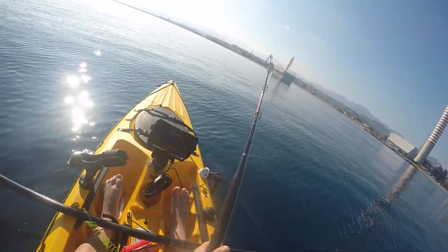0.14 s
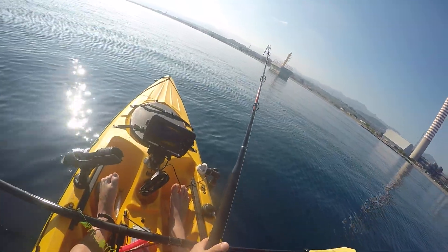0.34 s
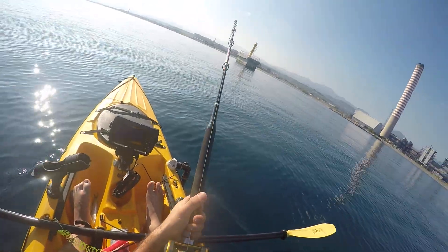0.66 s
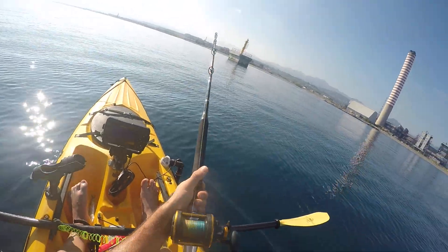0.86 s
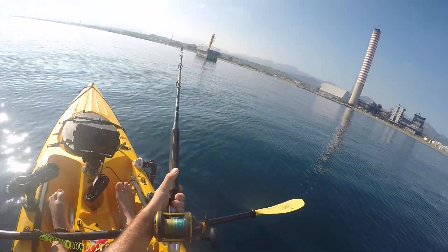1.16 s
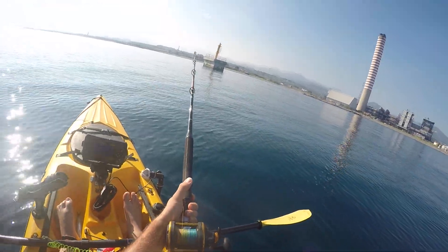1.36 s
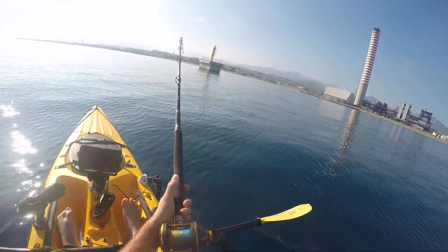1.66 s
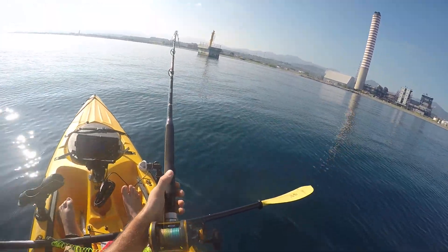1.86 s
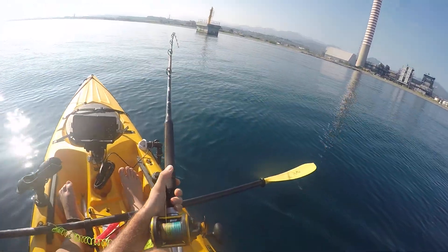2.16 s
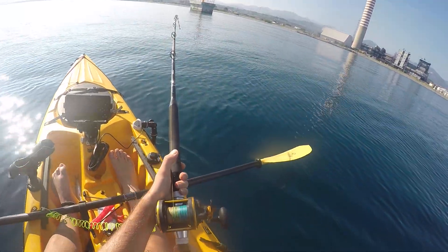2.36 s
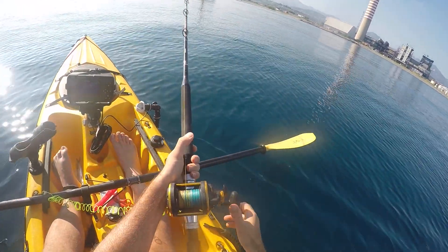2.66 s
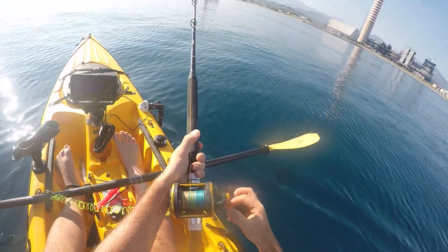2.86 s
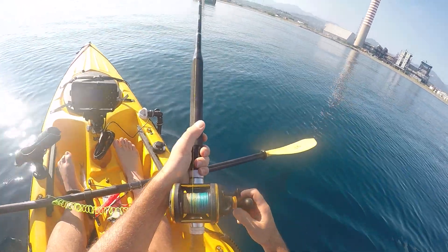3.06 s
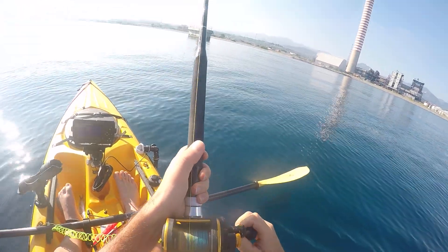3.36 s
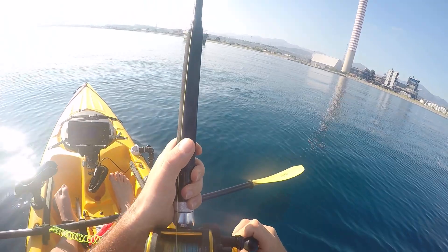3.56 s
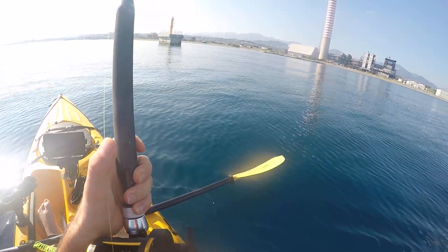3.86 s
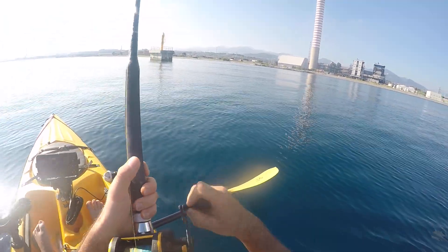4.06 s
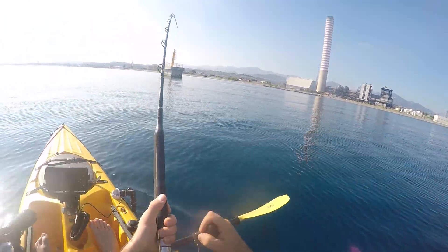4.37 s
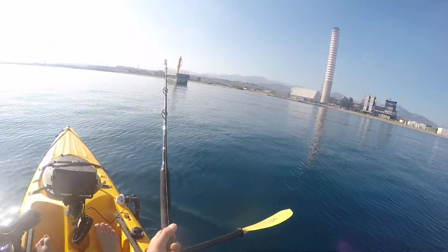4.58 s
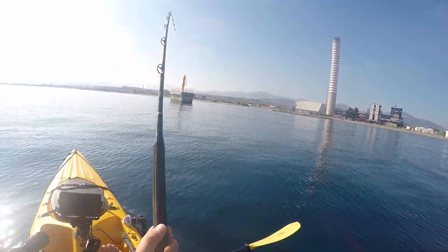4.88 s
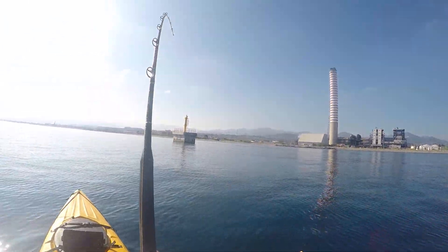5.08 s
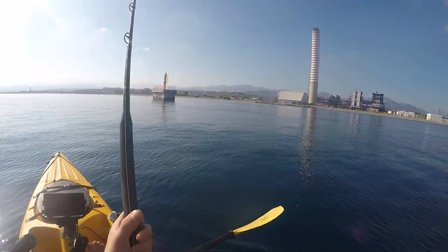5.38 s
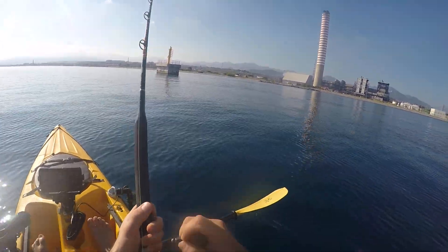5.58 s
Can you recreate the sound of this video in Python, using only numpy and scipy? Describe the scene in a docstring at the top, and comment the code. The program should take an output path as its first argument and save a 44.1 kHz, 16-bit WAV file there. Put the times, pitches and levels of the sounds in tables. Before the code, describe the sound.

A fishing reel's clicker buzzes in four short runs as line is pulled out, over light wind rumbling on the microphone.

```python
"""A fishing reel's clicker sounds as a hooked fish takes line from a kayak angler in four short runs.
The pawl snaps over the spool's ratchet, and each impact excites the resonances of the reel and the pawl
spring: single ticks merge into a buzz as the spool speeds up. The rod is lifted for the last two runs.
The line jerks tight once and rasps faintly under tension, and gear knocks softly on the hull.
Behind it all, light wind rumbles on the microphone over a calm sea."""
import sys
import numpy as np
from scipy import signal
from scipy.fft import rfft, irfft, next_fast_len
from scipy.io import wavfile

SR = 44100
rng = np.random.default_rng(int(sys.argv[2]) if len(sys.argv) > 2 else 0)


def pcm_store(signal):
    """Save signal as 16-bit PCM."""
    levels = np.round(np.clip(np.atleast_2d(signal), -1, 1) * 32767)
    wavfile.write(sys.argv[1], SR, levels.astype(np.int16).T)


N = 252693

# Spectra of the wind and of the sea's hush. Each row: frequency in Hz, relative spectral density in dB.
WIND_SPECTRUM = [(15, -11.5), (24, 8.5), (36, 4), (50, -2), (63, -13.5), (80, -16.5), (110, -26.5),
                 (200, -41), (500, -60), (1500, -120)]
SEA_SPECTRUM = [(76, -49), (130, -1.5), (344, -7), (446, -8.5), (482, -9), (1070, -11.5), (1470, -13.5),
                (2720, -13.5), (7050, -20), (8430, -22.5), (15000, -27.5)]
# Gusts. Each row: time of the peak in seconds, level in dB above the breeze.
WIND_GUSTS = [(.9, 2.5), (4.2, 5), (5.65, 11.5)]
# Spells of taut line. Each row: start in seconds, end in seconds, rasp level in dB.
LINE_PULLS = [(-.05, 0.148, -69.5), (0.557, 1.847, -69), (1.956, 2.69, -70), (4.91, 5.302, -73)]
# Gear striking the hull. Each row: time in seconds, level in dB, spectral tilt in dB per octave.
HULL_KNOCKS = [(.163, -32, -2), (.234, -35, 0), (.248, -37, 3), (5.18, -29, 3), (5.197, -30, -5)]
# Reflections from the angler's body and the hull. Each row: delay in seconds, gain in dB.
REFLECTIONS = [(.0026, -14), (.0058, -16.5)]
# Resonances of the hull, the jerked line, the pawl spring and the reel (rod low, rod lifted).
# Each row: centre frequency in Hz, width in Hz, relative level in dB.
HULL_MODES = [(880, 420, -2), (1380, 380, 0), (2900, 1500, -20)]
TWITCH_MODES = [(1380, 260, 1), (2630, 180, -12), (3590, 600, -0.5), (6340, 590, -17)]
PAWL_MODES = [(3353, 202, -3.5), (7670, 410, -25), (10120, 150, -17.5)]
REEL_LOW_MODES = [(1488, 330, -5), (2845, 470, 1.5), (3787, 440, 4), (4716, 810, -1.5), (5740, 240, -6.5),
                  (6480, 740, -10), (7340, 690, -8), (8550, 1400, -13.5), (10270, 1300, -3),
                  (12000, 1300, -12.5), (12900, 1300, -19), (14700, 1200, -16.5)]
REEL_LIFTED_MODES = [(1368, 340, -0.5), (1980, 120, -6.5), (2970, 590, -0.5), (3780, 610, 3),
                     (4470, 420, -2.5), (4860, 750, -2), (5790, 1110, -6.5), (7790, 1600, -9.5),
                     (10050, 1060, -3), (11400, 1100, -11.5), (12560, 2000, -12), (14900, 770, -14)]
# Single teeth slipping as the spool creeps.
# Each row: time in seconds, relative strike level in dB, emphasis of the spring's ring in dB.
SINGLE_TICKS = [(1.276, -42.5, -21), (2.608, -40, -9), (3.764, -69, 6), (4.673, -46, -17),
                (4.74, -47.5, 0.5), (4.967, -72.5, 13)]
# Spool speed in each of the four runs. Each row: time in seconds, speed in teeth per second.
RUN_1_SPEED = [(0.732, 41.1), (0.85, 88.4), (0.97, 65.7), (1.1, 82.6), (1.224, 39.5)]
RUN_2_SPEED = [(2.007, 39.2), (2.05, 60.4), (2.12, 115.0), (2.28, 137.7), (2.41, 136.4), (2.582, 47.3)]
RUN_3_SPEED = [(3.856, 19.5), (3.92, 59.4), (4.0, 86.0), (4.07, 161.0), (4.36, 145.6), (4.41, 215.2),
               (4.44, 124.6), (4.53, 136.0), (4.642, 39.9)]
RUN_4_SPEED = [(5.21, 51.4), (5.35, 188.2), (5.39, 109), (5.54, 192.7), (5.59, 93.4), (5.67, 248.5),
               (5.727, 101.7)]
# How the pawl lands in each run. Each row: relative strike level in dB at the start and at the end,
# emphasis of the spring's ring in dB at the start and at the end, scale of the judder in seconds.
PAWL_LANDINGS = [(-41.5, -42, 2.5, 1, .00003), (-43, -40, 4, 0, 0.000014), (-39.5, -46, 12, 0.5, 0.00028),
                 (-43, -43, 4.5, 4.5, 0.00018)]

LIFT_S = 3.5  # the rod is lifted towards the chest
SLIDE_S = .0006  # parts slide this long before they snap together
HIT_SIZE = 2048  # samples in one impact response
HIT_HZ = np.fft.rfftfreq(HIT_SIZE, 1 / SR)


def amp(db):
    """Amplitude grows tenfold for every 20 dB."""
    return 10 ** (np.asarray(db) / 20)


def unit(x):
    """Normalisation brings x to rms 1."""
    return x / np.sqrt(np.mean(x ** 2) + 1e-20)


def slope(points, hz):
    """A spectral envelope joins (Hz, dB) points on a logarithmic frequency axis."""
    corner_hz, db = np.transpose(points)
    return amp(np.interp(np.log(hz + 1), np.log(corner_hz), db))


def resonances(modes, hz):
    """Steep-sided resonance peaks add in power, giving a gain curve of rms 1."""
    peaks = (amp(db) / (1 + (2 * (hz - centre) / width) ** 2) for centre, width, db in modes)
    return unit(np.sqrt(sum(peak ** 2 for peak in peaks)))


def filtered(x, gain):
    """A linear filter multiplies the spectrum by gain(hz)."""
    size = next_fast_len(N + SR // 2)
    return irfft(rfft(x, size) * gain(np.fft.rfftfreq(size, 1 / SR)), size)[:N]


def noise(gain):
    """Filtering white noise gives coloured noise, here of rms 1."""
    return unit(filtered(rng.standard_normal(N), gain))


def causal(gains):
    """Causality: minimum phase makes each gain curve ring only after the blow."""
    cepstrum = irfft(np.log(gains + 1e-6))
    cepstrum[..., 1:HIT_SIZE // 2] *= 2
    cepstrum[..., HIT_SIZE // 2 + 1:] = 0
    return np.exp(rfft(cepstrum))


def contacts(count, chatter, t60, memory):
    """The force spectrum of a hard contact is an impulse plus a rattle, whose energy share is chatter."""
    t = np.arange(HIT_SIZE) / SR
    white = rng.standard_normal((count, HIT_SIZE))
    rattle = signal.lfilter([1], [1, -memory], white, axis=0)  # partly repeats the contact before
    rattle = rattle * np.minimum(t / SLIDE_S, 1) * amp(-60 * t / t60)
    rattle = rfft(rattle / np.linalg.norm(rattle, axis=1, keepdims=True))
    snap = np.exp(-2j * np.pi * HIT_HZ * SLIDE_S)
    share = np.clip(chatter, 0, 1)
    return np.sqrt(1 - share) * snap + np.sqrt(share) * rattle


def placed(times, spectra):
    """Superposition: each impact's spectrum becomes a waveform, added in at its time."""
    samples = np.round(times * SR).astype(int)[:, None] + np.arange(HIT_SIZE)
    return np.bincount(samples.ravel(), irfft(spectra).ravel(), N)[:N]


def wind_and_sea(breeze_db=-40.5, gust_sigma_s=0.27):
    """Turbulence on the microphone rumbles over steady noise: the sea's hush and a thin whine."""
    t = np.arange(N) / SR
    gust_db = sum(db * np.exp(-((t - peak_s) / gust_sigma_s) ** 2 / 2) for peak_s, db in WIND_GUSTS)
    wind = amp(breeze_db + gust_db) * noise(lambda hz: slope(WIND_SPECTRUM, hz))
    hush = amp(-64) * noise(lambda hz: slope(SEA_SPECTRUM, hz))
    whine = amp(-81) * noise(lambda hz: resonances([(8420, 400, 0)], hz))
    return wind + hush + whine


def cockpit_echoes(x, scatter_db, t60):
    """Reflection from body and hull gives two quick echoes and a short scatter; open water gives none."""
    t = np.arange(HIT_SIZE) / SR
    tail = rng.standard_normal(HIT_SIZE) * amp(-60 * t / t60) * (t > .002)
    response = amp(scatter_db) * tail / np.linalg.norm(tail)
    for delay, db in REFLECTIONS:
        response[round(delay * SR)] += amp(db)
    return signal.fftconvolve(x, response)[:N]


def hull_knocks():
    """Light impacts excite the plastic hull's modes; each knock has its own brightness."""
    times, db, tilt = np.transpose(HULL_KNOCKS)
    octaves = np.log2(np.clip(HIT_HZ, 700, 1500) / 1200)
    colour = resonances(HULL_MODES, HIT_HZ) * amp(tilt[:, None] * octaves)
    force = contacts(len(times), chatter=.3, t60=.015, memory=0)
    return placed(times, amp(db)[:, None] * force * causal(colour))


def line_rasp(fade_s=0.12):
    """Line under tension gives narrow-band noise, which fades in and out with each pull."""
    t = np.arange(N) / SR
    taut = sum(amp(db) * np.clip(np.minimum(t - start, end - t) / fade_s + .5, 0, 1)
               for start, end, db in LINE_PULLS)
    return taut * noise(lambda hz: resonances([(1427, 210, 1.0), (3700, 760, -10.0)], hz))


def line_twitch(time_s=.3085, db=-18.5):
    """Slack line jerks tight, and the impulse rings damped resonances as one sharp tick."""
    force = contacts(1, chatter=.15, t60=.012, memory=0)
    response = causal(resonances(TWITCH_MODES, HIT_HZ))
    return placed(np.array([time_s - SLIDE_S]), amp(db) * force * response)


def pawl_drops(spool, strike_from_db, strike_to_db, ring_from_db, ring_to_db, judder_s):
    """Rotation is the integral of speed, and the pawl drops once for every tooth turned."""
    choke_speed, choke_spread, race_speed = 125, 13, 146  # teeth per second
    choke_db, race_db_per_octave = 8.5, 4
    knot_s, knot_speed = np.transpose(spool)
    t = np.arange(knot_s[0], knot_s[-1], 1 / SR)
    turned = np.cumsum(np.interp(t, knot_s, knot_speed)) / SR
    times = np.interp(np.arange(np.ceil(turned[-1])), turned, t)
    speed = np.interp(times, knot_s, knot_speed)
    progress = (times - knot_s[0]) / (knot_s[-1] - knot_s[0])
    strike_db = strike_from_db + (strike_to_db - strike_from_db) * progress
    strike_db += race_db_per_octave * np.maximum(np.log2(speed / race_speed), 0)  # racing strikes harder
    strike_db[0] -= 1  # the spool has barely started
    # On a fast spool the next tooth stops the spring's ring, and the timing judders.
    fast = 1 / (1 + np.exp((choke_speed - speed) / choke_spread))
    ring_db = ring_from_db + (ring_to_db - ring_from_db) * progress - choke_db * fast
    lag = signal.lfilter([1], [1, -.7], rng.standard_normal(len(times)))  # 70% carries to the next tooth
    return np.column_stack([times + judder_s * fast * lag, speed, strike_db, ring_db])


def clicker(drops, modes, body_db, pawl_db, frame_db_per_octave, chatter, jitter_s):
    """Impact excitation: each drop of the pawl rings the modes of the reel and of the pawl's spring."""
    speed, strike_db, ring_db = drops.T[1:, :, None]
    # The frame's low modes vary with speed, and get less when the spring rings freely.
    low_db = frame_db_per_octave * np.log2(np.maximum(speed, 50) / 130) - 0.9 * np.maximum(ring_db, 0)
    low_shelf = amp(low_db / (1 + (HIT_HZ / 2300) ** 8))
    body = amp(body_db) * low_shelf * resonances(modes, HIT_HZ)
    spring = amp(ring_db + pawl_db) * resonances(PAWL_MODES, HIT_HZ)
    colour = np.hypot(body, spring)
    # The pawl rattles more on a fast spool, most of all in the treble.
    force = contacts(len(drops), chatter + speed / 800 + HIT_HZ / 14000, t60=.012, memory=.45)
    # The spring gives a drop the same energy however it rattles.
    force /= np.linalg.norm(force * colour, axis=1, keepdims=True)
    force *= np.linalg.norm(colour, axis=1, keepdims=True)
    uneven = rng.standard_normal((len(drops), 2))
    strength = amp(strike_db + 0.2 * uneven[:, :1])
    times = drops[:, 0] - SLIDE_S + jitter_s * uneven[:, 1]
    return placed(times, strength * force * causal(colour))


def reel():
    """Impact trains buzz at the tooth rate; the timbre shifts as the lifted reel shows another face."""
    spools = (RUN_1_SPEED, RUN_2_SPEED, RUN_3_SPEED, RUN_4_SPEED)
    runs = [pawl_drops(spool, *landing) for spool, landing in zip(spools, PAWL_LANDINGS)]
    ticks = np.insert(np.array(SINGLE_TICKS), 1, 0, axis=1)  # drops at zero speed
    drops = np.vstack(runs + [ticks])
    lifted = drops[:, 0] > LIFT_S
    rod_low = clicker(drops[~lifted], REEL_LOW_MODES, body_db=25.0, pawl_db=23.5,
                      frame_db_per_octave=1.5, chatter=0.027, jitter_s=4e-5)
    rod_lifted = clicker(drops[lifted], REEL_LIFTED_MODES, body_db=24.5, pawl_db=22.5,
                         frame_db_per_octave=-1.5, chatter=0.6, jitter_s=5e-5)
    return rod_low + rod_lifted


def scene():
    """Pressures add in the open air: nearby impacts, their echoes, the line's rasp, wind and sea."""
    impacts = reel() + line_twitch() + hull_knocks()
    echoes = cockpit_echoes(impacts, scatter_db=-10, t60=0.016)
    return (impacts + echoes + line_rasp() + wind_and_sea())[None]


def record(dry):
    """Band limiting: a steep low-pass filter removes the highest treble."""
    cutoff_hz = 15800
    return filtered(dry[0], lambda hz: 1 / np.sqrt(1 + (hz / cutoff_hz) ** 120))[None]


dry = scene()
out = record(dry)
pcm_store(out)
```